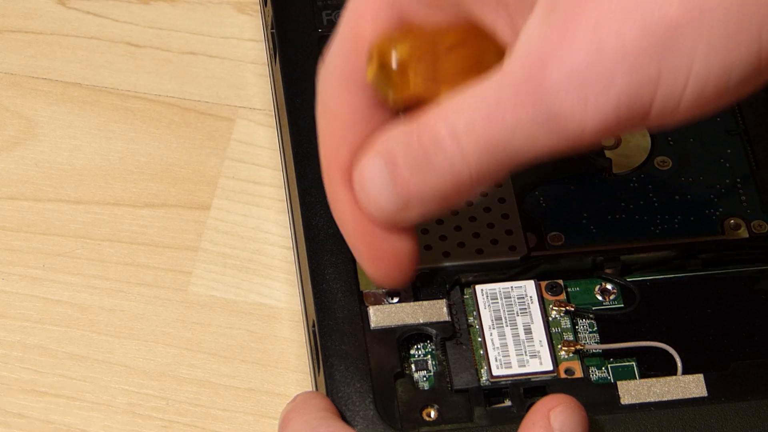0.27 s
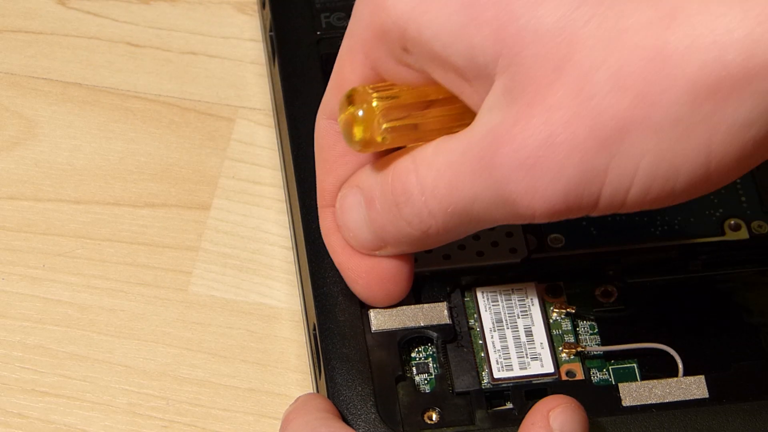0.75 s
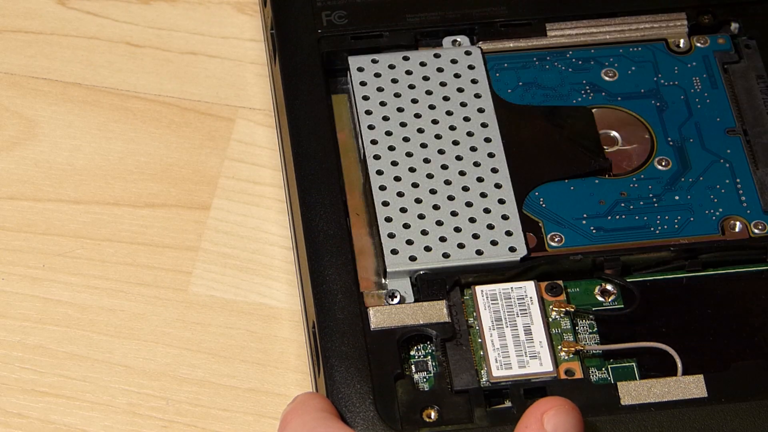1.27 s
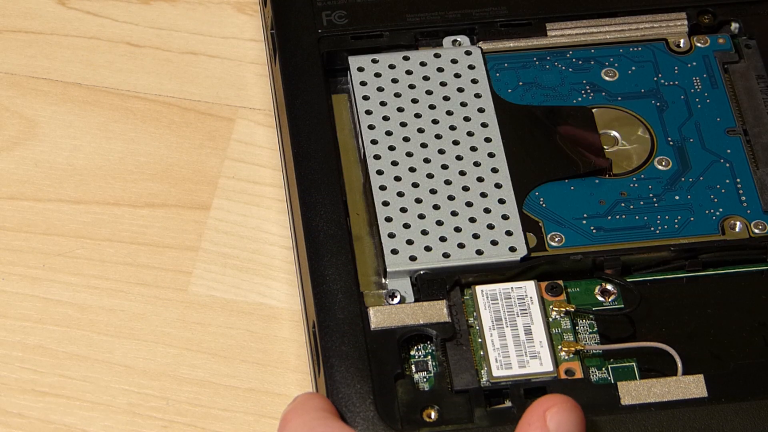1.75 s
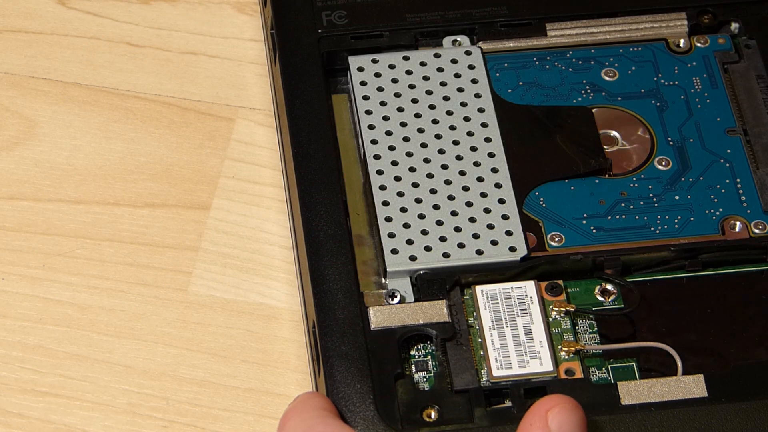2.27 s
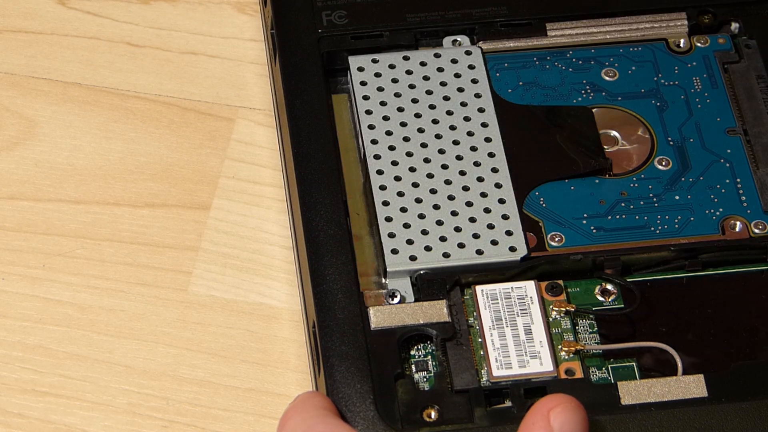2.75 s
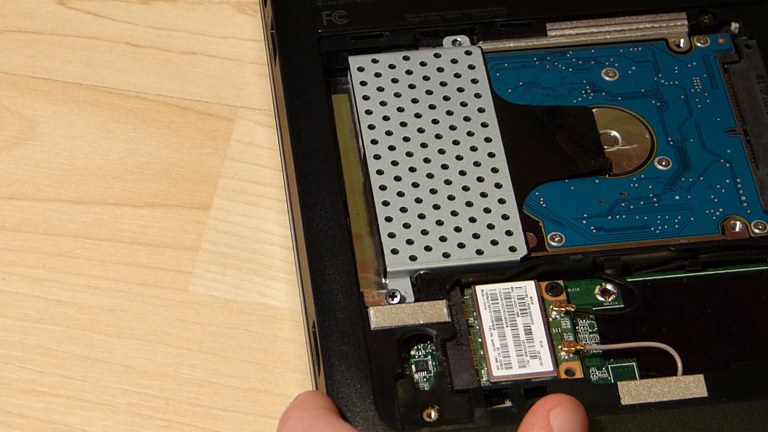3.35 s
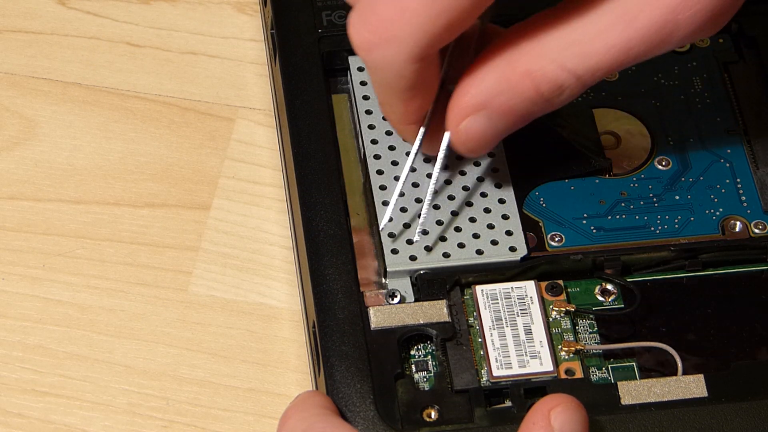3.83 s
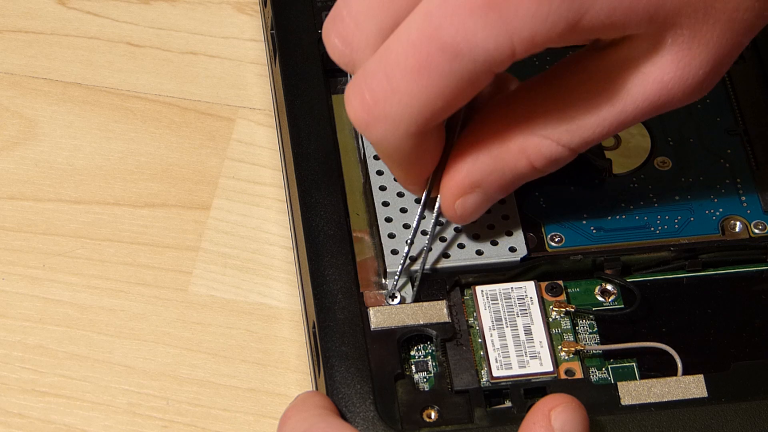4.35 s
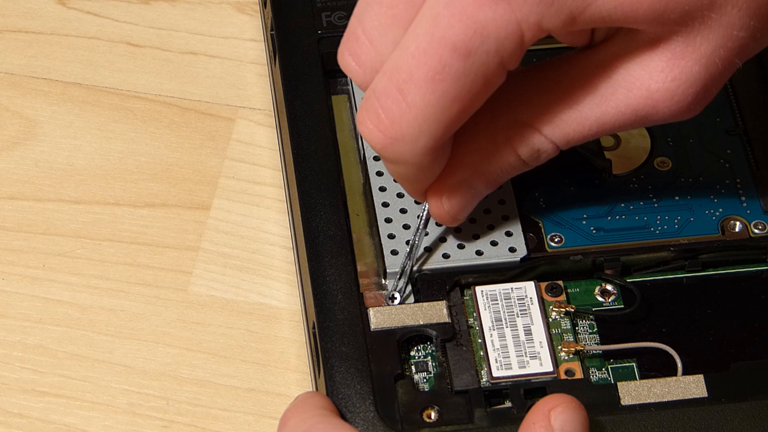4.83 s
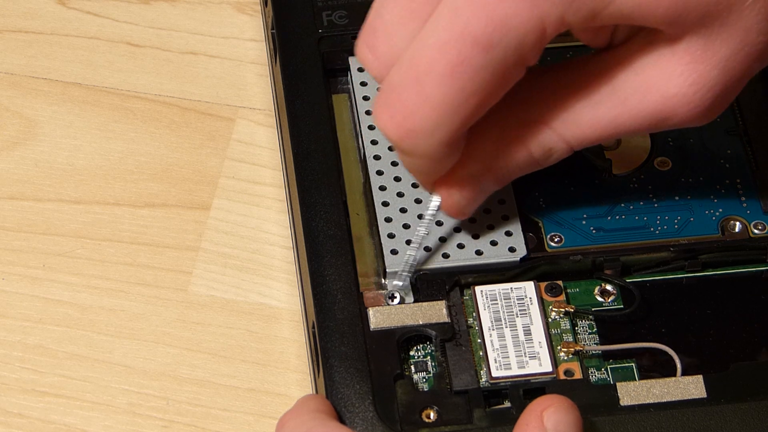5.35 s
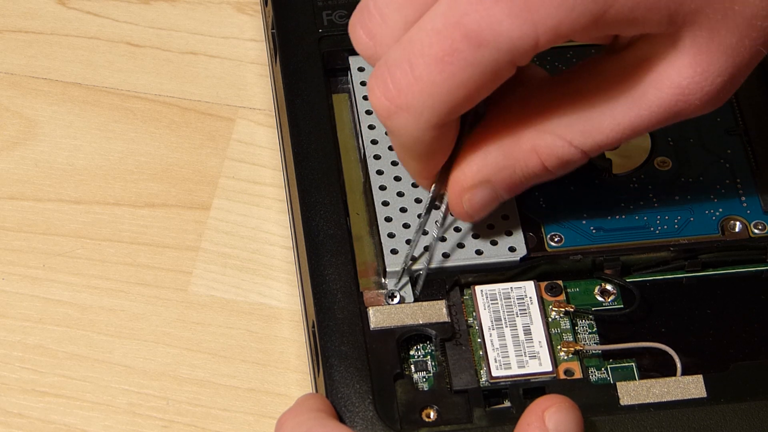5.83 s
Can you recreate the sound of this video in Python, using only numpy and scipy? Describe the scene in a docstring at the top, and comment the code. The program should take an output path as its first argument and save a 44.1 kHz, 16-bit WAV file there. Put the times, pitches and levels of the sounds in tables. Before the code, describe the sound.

A faint, steady, fan-like hum fills a small room throughout. At about 1.1 seconds a screwdriver bit leaves a laptop screw with a small, close snap. At 1.6 seconds the screwdriver lands on a wooden desk, slightly to the right, in the loudest event: a quick cluster of knocks and bounces, with the steel shaft scraping and ringing brightly while the handle rattles and rolls. It settles by about 2 seconds, and the ring fades soon after. From 2 to 3.5 seconds a hand brushes very softly over the wood in three sweeps, with two tiny metal ticks around 2.9 and 3.3 seconds. Between 4.3 and 4.7 seconds tweezers tick lightly and irregularly against the screw and its metal bracket, straight ahead. More small ticks follow from 5.2 to 5.4 seconds, and a few fainter ones come near 6 seconds.

```python
"""A screwdriver snaps off its screw in an open laptop, over the faint fan-like hum of a small room.
It is laid on the wooden desk, a little to the right: it knocks and bounces, the steel shaft scrapes
and rings in its bending modes, the fluted handle rattles and rolls. A hand brushes over the wood,
then tweezers tick against the small screw and its perforated bracket."""
import sys
import numpy as np
from scipy import signal
from scipy.fft import rfft, irfft
from scipy.io import wavfile
from scipy.ndimage import uniform_filter1d

SR = 44100
rng = np.random.default_rng(int(sys.argv[2]) if len(sys.argv) > 2 else 0)


def transcribe(u):
    """Save the signal u as a 16-bit wav file named by the first command-line argument.

    u: samples, shape (n,) or (channels, n), limited to [-1, 1]; the rate is SR.
    q: integer samples, one column per channel.
    """
    v = np.clip(np.atleast_2d(u).T, -1, 1)
    q = np.round(v * 32767).astype(np.int16)
    wavfile.write(sys.argv[1], SR, q)


N = 268569
TIME = np.arange(N) / SR


# the screwdriver's hits on the desk: (time [s], level [dB], treble gain [dB], t60 [s])
KNOCK_HITS = [(1.6040, -20.5, 12.5, 0.02), (1.6157, -26, 19, 0.012), (1.6773, -23.5, 6.5, 0.0081),
              (1.6938, -12, -11, 0.011), (1.7048, -14.5, 3.5, .008), (1.7392, -26, -2, .008),
              (1.757, -28, -6.5, 0.0098), (1.8792, -28, 17, 0.011), (1.8801, -18.5, -0.5, 0.057),
              (1.9141, -25.5, -14, .008), (1.9188, -18.5, -8, 0.0081), (1.9461, -23, -14, 0.0018)]
# tone of a knock: (frequency [Hz], gain [dB])
KNOCK_EQ = [(40, -24.5), (130, -35.5), (350, -12), (600, -9.5), (1100, -12.5), (1700, 3.5), (2400, -2),
            (3400, 3), (4500, -1), (8000, -8), (10500, -17.5), (15000, -32)]
def screwdriver_knocks(room_db=-4):
    """The screwdriver lands and bounces: bright on its steel, duller on its handle."""
    dry = np.zeros(N)
    for start, db, treble_db, t60 in KNOCK_HITS:
        knock = eq(burst(t60), KNOCK_EQ)
        knock = eq(knock, [(2500, 0), (7000, treble_db)])
        add(dry, start, at_level(knock, db))
    return dry + amp(room_db) * reverb(dry)


# the shaft strikes and chatters; the spot that touches favours the modes near one pitch:
# (time [s], chatter length [s], level [dB], favoured pitch [Hz], roll-off [dB per squared octave])
SHAFT_STRIKES = [(1.603, 0.0018, -22.5, 13100, 8.5), (1.604, .015, -24.5, 5000, 42),
                 (1.618, 0.027, -22, 6300, 32), (1.677, 0.014, -19.5, 6600, 19.5),
                 (1.695, 0.012, -16.5, 7300, 56), (1.706, 0.0079, -23, 3220, 13),
                 (1.73, 0.052, -25, 4700, 23), (1.916, 0.026, -34, 5450, 7.5),
                 (1.988, .006, -28.5, 7400, 70), (1.978, .05, -32, 4300, 27)]
def ring_envelope(hz, t60, rise_s=0.0012):
    """How strongly a bending mode rings over time: every strike adds energy, which then drains away."""
    energy = np.zeros(N)
    for start, hold, db, favoured_hz, rolloff_db in SHAFT_STRIKES:
        strength = amp(db - rolloff_db * np.log2(hz / favoured_hz) ** 2)
        energy += (strength * envelope(start, rise_s, hold, t60)) ** 2
    return np.sqrt(energy)


# the shaft's bending modes, in close groups: (pitch [Hz], wander [Hz], relative level [dB])
SHAFT_MODES = [
    [(2698, 4, 1.5)],
    [(4690, 9, -2), (4738, 8, -8), (4838, 15, -13)],
    [(7762, 14, -3.5), (7892, 20, -8), (7953, 15, -5)],
    [(11195, 35, -1)],
    [(14980, 40, 0)],
]
# the desk damps most of each group's ring: (gain [dB], damped t60 [s], lingering share [dB])
SHAFT_DAMPING = [(-2, 0.18, -6), (.5, .18, -14), (-0.5, .11, -16.5), (0, 0.13, -19), (-13.5, .11, -34.5)]
def shaft_ring(ring_db=-1.0, flutter_db=2.26, linger_t60=.5, swing_rad=.3):
    """Chatter on the desk keeps the steel ringing and fluttering; close modes beat until it settles."""
    out = np.zeros((2, N))
    since_landing = np.maximum(TIME - SHAFT_STRIKES[0][0], 0)
    partner_fade = amp(3 - 35 * since_landing)  # each group's upper modes fade, so the ring grows purer
    for modes, (group_db, t60, linger_db) in zip(SHAFT_MODES, SHAFT_DAMPING):
        lowest_hz = modes[0][0]
        damped = ring_envelope(lowest_hz, t60)
        lingering = amp(linger_db) * ring_envelope(lowest_hz, linger_t60)
        flutter = amp(flutter_db * drift(span=.005))
        level = np.sqrt(2) * amp(ring_db + group_db) * np.hypot(damped, lingering) * flutter
        # as the tool turns, its tones arrive slightly out of step left and right
        phase_shift = swing_rad * drift(span=0.0083) * np.array([[1], [-1]])
        for hz, wander_hz, db in modes:
            cycles = np.cumsum(hz + wander_hz * drift(span=0.011)) / SR + rng.random()
            fade = partner_fade if hz > lowest_hz else 1
            out += amp(db) * fade * level * np.sin(2 * np.pi * cycles + phase_shift)
    return out


# the tool lands, tips over, rolls and settles:
# (time [s], attack [s], hold [s], scrape level [dB], rattle level [dB])
SKID_MOVES = [(1.603, 0.0024, 0.057, -29.5, -46.5), (1.698, .012, .033, -36, -37),
              (1.777, 0.043, 0.028, -68, -39), (1.918, 0.016, 0.016, -33.5, -29.5)]
# bright steel scrape and hollow handle rattle: (frequency [Hz], gain [dB])
SCRAPE_EQ = [(130, -44.5), (320, -18.5), (1500, -16.5), (3000, -9.5), (4100, 1.5), (5300, 6), (6500, -2),
             (8200, 3.5), (9300, -10.5), (12000, -17), (13500, -33.5), (16000, -37)]
RATTLE_EQ = [(120, -34), (250, -10), (430, 4), (750, 1), (1200, 2), (1800, 2), (2400, -4.5), (3300, -0.5),
             (4500, -1), (7000, -6.5), (12000, -35.5)]
def screwdriver_skids(room_db=-1):
    """In each skid the steel scrapes in fine grains while the fluted handle rattles in coarser ones."""
    scrape = levelled(eq(grains(per_s=1700, spread_db=-0.5), SCRAPE_EQ), span=.015)
    rattle = levelled(eq(grains(per_s=1200, spread_db=1.5), RATTLE_EQ), span=0.035)
    dry = np.zeros(N)
    for start, rise, hold, scrape_db, rattle_db in SKID_MOVES:
        dry += amp(scrape_db) * scrape * envelope(start, rise, hold, t60=.19)
        dry += amp(rattle_db) * rattle * envelope(start, rise, hold, t60=.2)
    return dry + amp(room_db) * reverb(dry)


# the desk top's wooden resonances: (pitch [Hz], bandwidth [Hz], relative level [dB])
DESK_MODES = [(195, 31.4, -5), (494.7, 27, -1), (654, 60, -9), (810, 47, -11)]
def handle_roll(gain_db=-34, room_db=-4):
    """The handle rolls over its flutes and drums on the desk top."""
    taps = grains(per_s=400, spread_db=3)
    drum = np.zeros(N)
    for hz, width, db in DESK_MODES:
        drum += np.sqrt(2) * amp(db) * levelled(resonate(taps, hz, width), span=0.042).imag
    swell = amp(gain_db) * envelope(start=1.786, rise=.014, hold=.058, t60=.16)
    dry = eq(drum * swell, [(115, -28), (160, -8), (900, -0.5), (2500, -4)])
    return dry + amp(room_db) * reverb(dry)


# the bit lets go of the screw and rebounds: (time [s], level [dB], t60 [s])
SNAP_HITS = [(1.1068, -31, 0.023), (1.109, -34.5, 0.0081), (1.1214, -38.5, .02), (1.128, -64.5, .01)]
# tone of the snap: (frequency [Hz], gain [dB])
SNAP_EQ = [(100, -14.5), (300, -13.5), (450, -2), (600, -9.5), (900, -1), (1400, 1), (1750, -6.5),
           (4400, -6), (5300, -1), (7300, -4), (8800, 2.5), (10200, -11), (13000, -19), (16000, -30)]
def bit_snap(room_db=-1):
    """The bit jumps out of the screw head and the laptop's case answers."""
    dry = np.zeros(N)
    for start, db, t60 in SNAP_HITS:
        snap = eq(burst(t60), SNAP_EQ)
        add(dry, start, at_level(snap, db))
    return dry + amp(room_db) * reverb(dry)


# small steel contacts: (time [s], level [dB], ping pitch [Hz], ping share [dB], body gain [dB], t60 [s])
TICK_HITS = [(1.5628, -44.5, 5900, -28, -4, .015), (2.9271, -54, 8320, -6, -6.5, .003),
             (3.281, -57.5, 7960, -3, -12, 0.039), (4.3138, -48.5, 8500, -9, 3, 0.014),
             (4.3386, -54, 4860, 3, 3, .017), (4.4165, -50, 6060, 1, 5, 0.021),
             (4.5016, -61, 5820, -1, -4, .02), (4.5154, -59, 5830, 1, 2, .02),
             (4.597, -51, 4670, -2, -7, .013), (4.6465, -39, 8150, -10, -5, 0.022),
             (5.154, -50.5, 5900, -5, -1, 0.014), (5.2583, -43, 8330, 6, -21, 0.0091),
             (5.259, -50.5, 2600, 13, -5, 0.01), (5.382, -52, 2710, 8, -16, 0.079),
             (5.4159, -52.5, 2570, -22.5, 9, .011), (5.433, -54, 7000, 2, 1, .01),
             (5.912, -61.5, 7040, -5, 6, 0.037), (5.9753, -60, 2210, 2, 0, .03),
             (6.0208, -53.5, 2800, 3.5, -16, 0.065)]
# tone of a tick: (frequency [Hz], gain [dB])
TICK_EQ = [(100, -30.5), (480, -5), (1400, -0.5), (2400, -1.5), (3600, -5.5), (4700, -0.5), (6300, 1.5),
           (8000, 7), (9200, 3), (10400, 3.5), (11800, -12), (16000, -16)]
def steel_ticks(ping_width_hz=1700, room_db=-1.6):
    """A steel tip meets screw or bracket: a bright click, with a short ping set by the spot touched."""
    dry = np.zeros(N)
    for start, db, ping_hz, ping_db, body_db, t60 in TICK_HITS:
        click = eq(burst(t60), TICK_EQ)
        click = eq(click, [(2500, body_db), (4500, 0.0018)])  # low shelf sets the body
        ping = resonate(click, ping_hz, ping_width_hz)
        ping = resonate(ping, ping_hz, ping_width_hz).imag  # a second pass focuses the pitch
        tick = unit(click) + amp(ping_db) * unit(ping)
        add(dry, start, at_level(tick, db))
    return dry + amp(room_db) * reverb(dry)


# the hand sweeps over the desk on its way to the tweezers: (time [s], length [s], relative level [dB])
HAND_SWEEPS = [(1.963, .4, -59), (2.34, 0.44, -58), (3.116, 0.36, -68)]
# tone of skin on wood: (frequency [Hz], gain [dB])
SKIN_EQ = [(130, -33), (205, 1), (300, -8.5), (600, -4.5), (950, 3.5), (1400, -6), (2100, -3.5),
           (3200, -15.5), (4500, -12), (7500, -10), (10000, -16), (14000, -45)]
def hand_brush(arch=0.52):
    """Skin slides softly over wood: fine, dense friction grains swell and fade with each sweep."""
    swell = np.zeros(N)
    for start, length, db in HAND_SWEEPS:
        progress = np.clip((TIME - start) / length, 0, 1)
        swell += amp(db) * abs(np.sin(np.pi * progress)) ** arch
    friction = eq(grains(per_s=15000, spread_db=4.5), SKIN_EQ)
    dry = unit(friction) * swell
    return (dry + reverb(dry)) / np.sqrt(2)


# the small room's decay: (frequency [Hz], t60 [s])
REVERB_DECAY = [(150, 0.18), (500, 0.34), (2000, .33), (5500, 0.36), (9000, 0.25), (15000, 0.13)]
# stereo width of its reflections: (frequency [Hz], side minus mid [dB])
REVERB_WIDTH = [(150, -0.5), (400, -1.5), (700, -1.5), (1400, -5), (4000, -7), (8000, -2), (15000, -6.5)]
def reverb(x, echoes_per_s=5000, predelay_s=.002):
    """Dense reflections from the desk and near walls, each band dying at its own speed."""
    size = SR // 2
    echoes = rng.standard_normal((2, size)) * (rng.random((2, size)) < echoes_per_s / SR)
    echoes *= TIME[:size] > predelay_s
    hz, t, bands = signal.stft(echoes, SR, nperseg=256)
    decay = amp(-60 * t / curve_at(REVERB_DECAY, hz)[:, None])
    _, tail = signal.istft(bands * decay, SR, nperseg=256)
    tail = widen(tail, REVERB_WIDTH)
    return signal.fftconvolve(x[None], tail / np.linalg.norm(tail[0]), axes=1)[:, :N]


# tone of the room's air: (frequency [Hz], gain [dB])
AIR_EQ = [(20, -8.5), (60, -10.5), (120, -10.5), (190, -10.5), (250, -5), (340, -6.5), (470, -4),
          (570, -5.5), (720, -4.5), (1250, -8), (1700, -9.5), (2600, -16.5), (6000, -18.5), (12000, -24.5),
          (16000, -33)]
# its stereo width: (frequency [Hz], side minus mid [dB])
AIR_SPREAD = [(60, -14), (110, -16), (200, 0), (380, 3.5), (700, 4.5), (1290, 0.5), (2380, -1),
              (4400, -1.5), (8120, -3.5), (15000, -2)]
# fan hum: (pitch [Hz], level [dB])
FAN_TONES = [(678.3, -74.5), (1287, -75.5), (5760, -84.5)]
def room_tone(air_db=-62.5, waver_hz=2):
    """A steady bed of diffuse air noise with a few faint, wavering fan tones."""
    mid_side = np.array([unit(eq(noise, AIR_EQ)) for noise in rng.standard_normal((2, N))])
    hum = np.zeros(N)
    for hz, db in FAN_TONES:
        cycles = np.cumsum(hz + waver_hz * drift(span=0.19)) / SR
        hum += amp(db) * np.sqrt(2) * np.sin(2 * np.pi * cycles)
    return amp(air_db) * widen(mid_side, AIR_SPREAD) + hum


def burst(t60):
    """A contact's dense cluster of modes, played as 0.1 s of fast-dying noise."""
    t = np.arange(SR // 10) / SR
    return rng.choice([-1, 1], len(t)) * amp(-60 * t / max(t60, .002))


def grains(per_s, spread_db):
    """Random tiny impacts of uneven size."""
    hits = rng.random(N) < per_s / SR
    size = np.minimum(rng.exponential(1, N), 4)
    return hits * amp(spread_db * size) * rng.choice([-1, 1], N)


def envelope(start, rise, hold, t60):
    """A contact builds up, holds while it lasts, then dies away."""
    t, out = TIME[:SR], np.zeros(N)
    attack = np.minimum(t / max(rise, 1 / SR), 1)
    release = amp(-60 * np.maximum(t - rise - hold, 0) / t60)
    add(out, start, attack * release)
    return out


def drift(span):
    """Smooth random modulation of rms 1 that changes over about span seconds."""
    size = max(int(span * SR), 2)
    smoothed = uniform_filter1d(rng.standard_normal(N), size, mode="wrap")
    return unit(uniform_filter1d(smoothed, size, mode="wrap"))


def resonate(x, hz, width):
    """One mode driven by x, as a complex signal whose imaginary part is the motion."""
    pole = np.exp((2j * np.pi * hz - np.pi * width) / SR)
    return signal.lfilter([1], [1, -pole], x)


def eq(x, points, size=4096):
    """Minimum-phase filter through points of (frequency [Hz], gain [dB])."""
    log_gain = np.log(amp(curve_at(points, abs(np.fft.fftfreq(size, 1 / SR)))))
    response = np.exp(np.conj(signal.hilbert(log_gain)))
    taps = np.fft.ifft(response).real[:size // 2]
    return signal.oaconvolve(x, taps)[:len(x)]


def widen(mid_side, width):
    """Left and right from mid and side, with the side shaped by a width curve."""
    mid, side = mid_side
    side_gain = amp(curve_at(width, np.fft.rfftfreq(len(side), 1 / SR)))
    side = irfft(rfft(side) * side_gain, len(side))
    return np.array([mid + side, mid - side])


def levelled(x, span):
    """Holds the power near 1 over span seconds, keeping faster flutter."""
    power = uniform_filter1d(abs(x) ** 2, max(int(span * SR), 2))
    return x / np.sqrt(abs(power) + 1e-12)


def at_level(x, db):
    """Gives a hit the energy of 3 ms at the given level."""
    return amp(db) * x / np.linalg.norm(x) * np.sqrt(.003 * SR)


def add(mix, start, sound):
    """Drops a sound into the mix at start seconds."""
    part = mix[round(start * SR):][:len(sound)]
    part += sound[:len(part)]


def curve_at(points, hz):
    """Reads a curve on a log-frequency axis."""
    point_hz, values = np.transpose(points)
    return np.interp(np.log(hz + 1), np.log(point_hz + 1), values)


def amp(db):
    """Decibels to gain."""
    return 10 ** (np.asarray(db) / 20)


def unit(x):
    """Scales to rms 1."""
    return x / np.sqrt(np.mean(x ** 2) + 1e-20)


# panning of the sounds on the desk: (frequency [Hz], left minus right [dB])
DESK_PAN = [(200, 1.5), (380, -4.5), (700, -3), (1300, -3), (2400, -2.5), (4400, -1), (9000, -1.5)]
def scene(room_pan_db=-1.13):
    """The screwdriver lands a little to the right; the work on the laptop is straight ahead."""
    desk = screwdriver_knocks() + screwdriver_skids() + shaft_ring() + handle_roll() + hand_brush()
    pan_db = curve_at(DESK_PAN, np.fft.rfftfreq(N, 1 / SR))
    desk = irfft(rfft(desk) * amp([pan_db / 2, -pan_db / 2]), N)
    laptop = bit_snap() + steel_ticks()
    background = room_tone() * amp([[room_pan_db / 2], [-room_pan_db / 2]])
    return laptop + desk + background


def record(dry, dc_offset=-.0028, cutoff_hz=16000):
    """Adds a small steady offset and cuts the highest treble."""
    lowpass = signal.firwin(511, cutoff_hz, window=("kaiser", 9), fs=SR)
    return signal.oaconvolve(dry + dc_offset, lowpass[None], "same")


dry = scene()
out = record(dry)
transcribe(out)
```